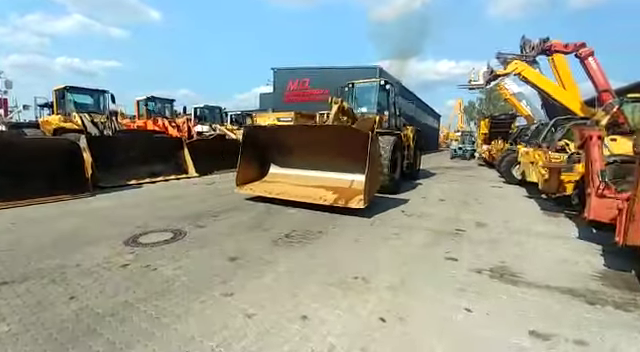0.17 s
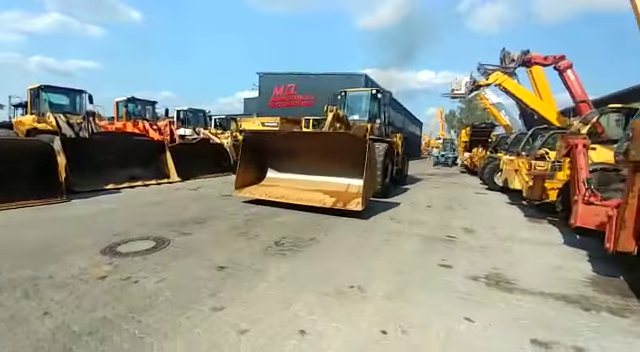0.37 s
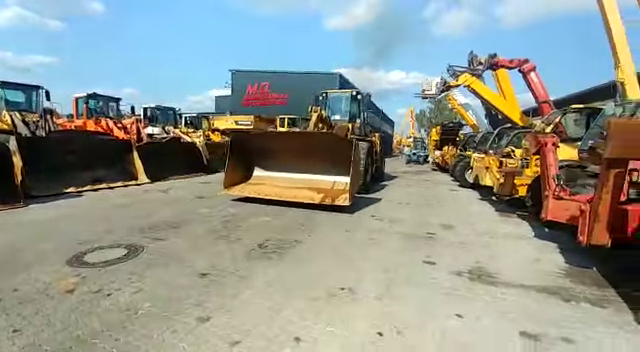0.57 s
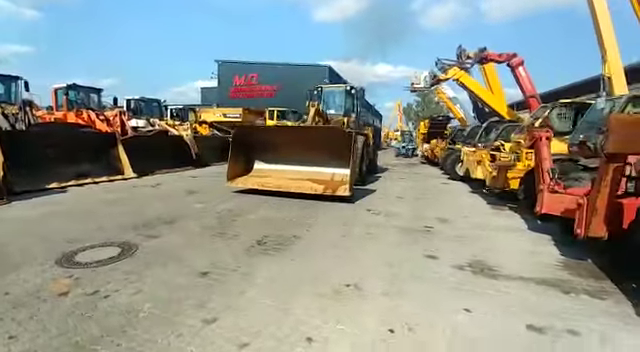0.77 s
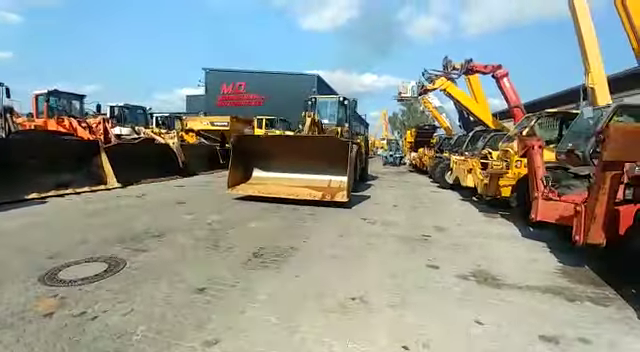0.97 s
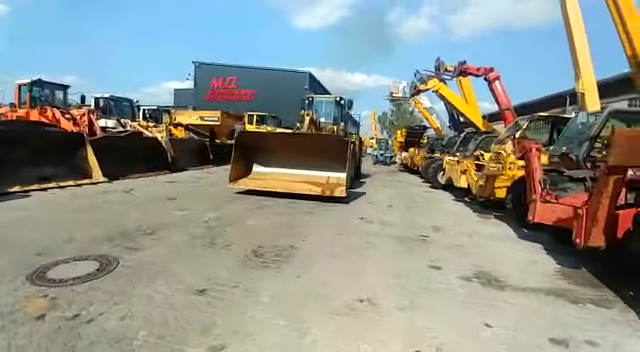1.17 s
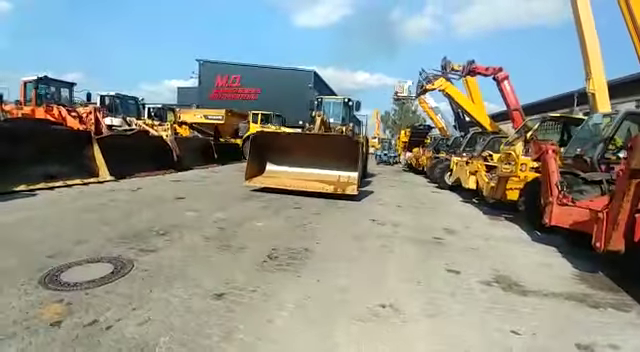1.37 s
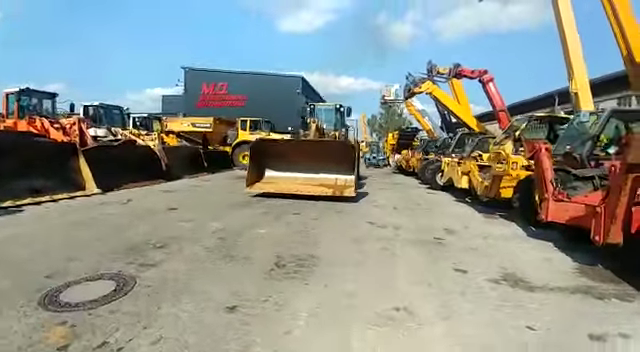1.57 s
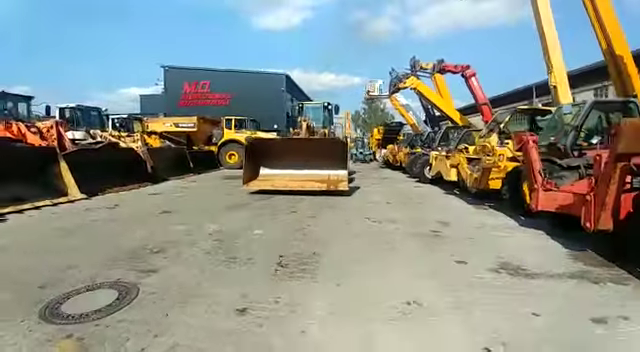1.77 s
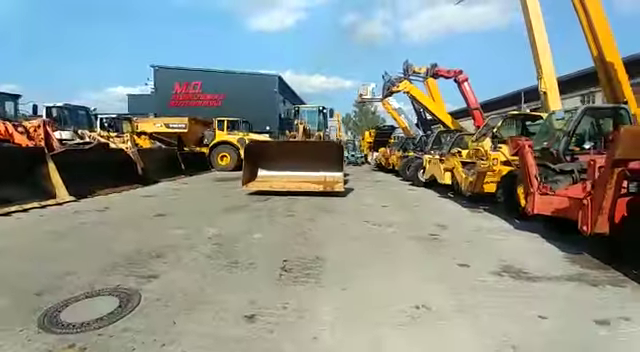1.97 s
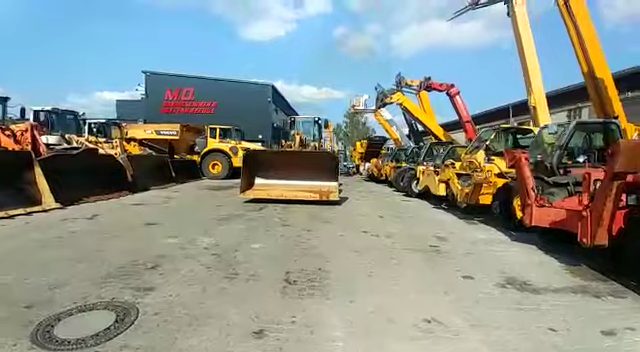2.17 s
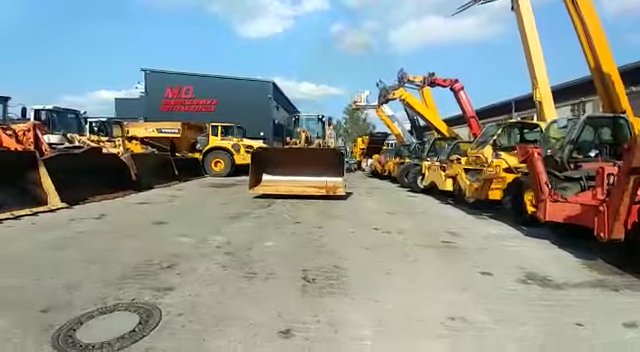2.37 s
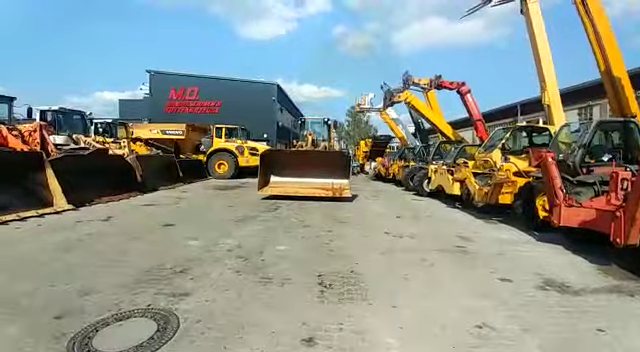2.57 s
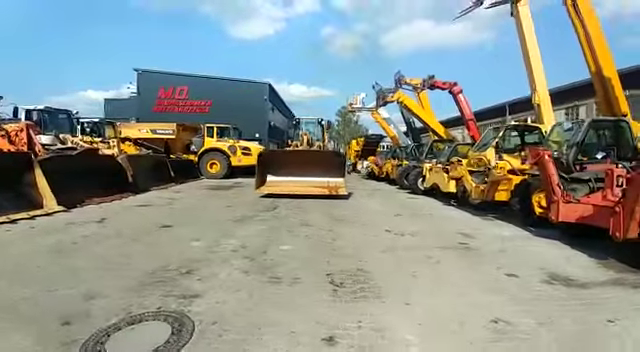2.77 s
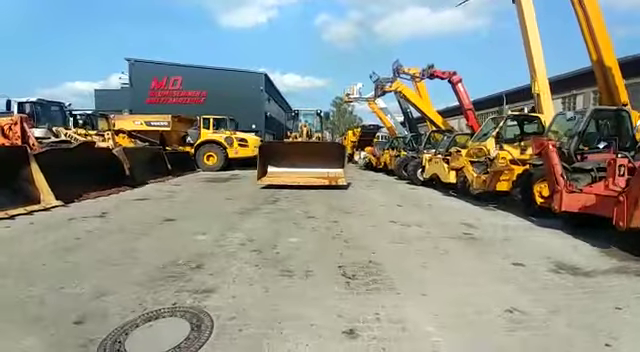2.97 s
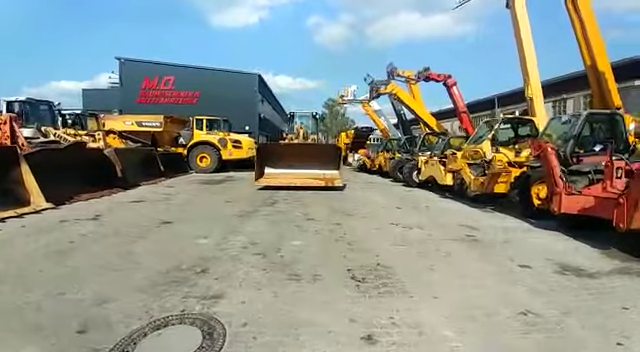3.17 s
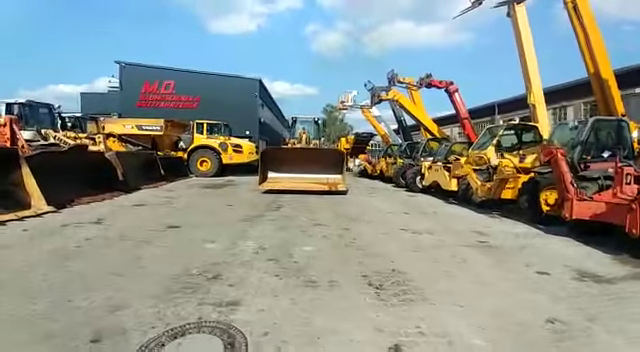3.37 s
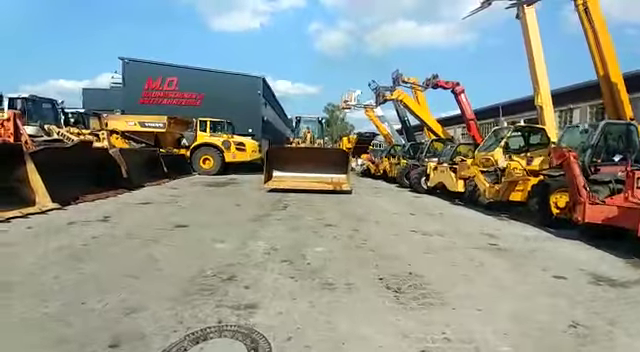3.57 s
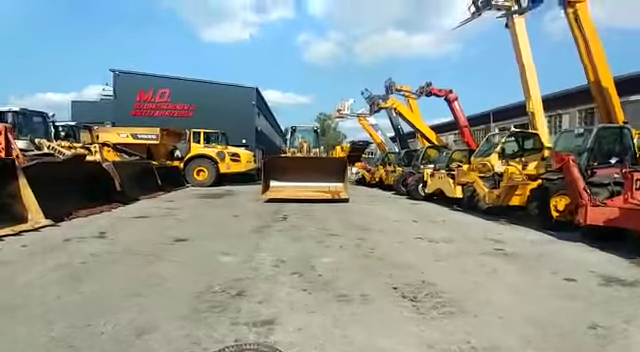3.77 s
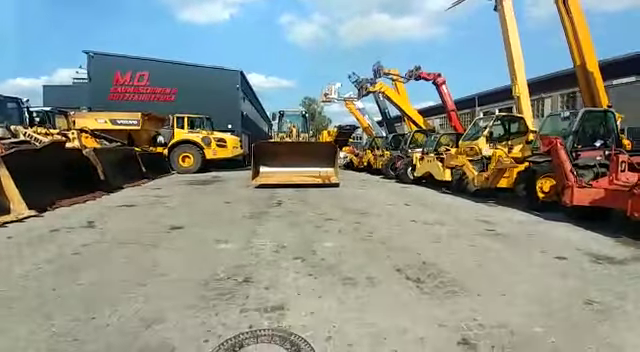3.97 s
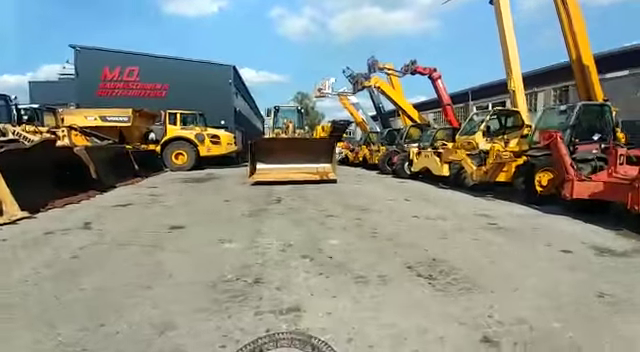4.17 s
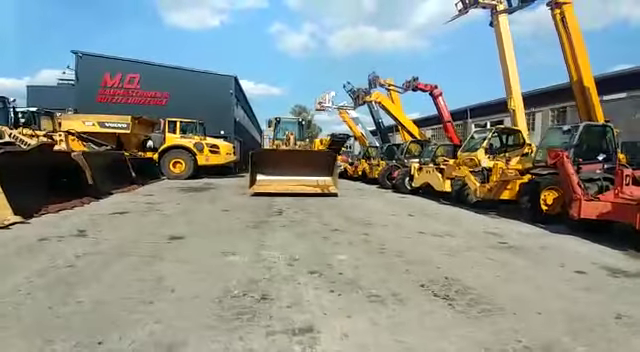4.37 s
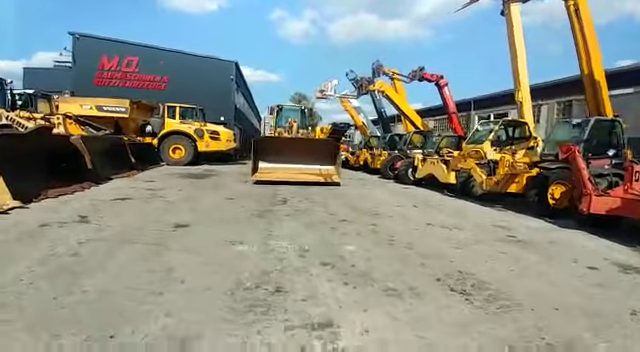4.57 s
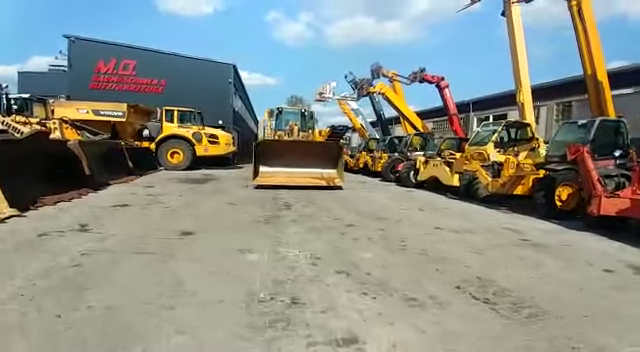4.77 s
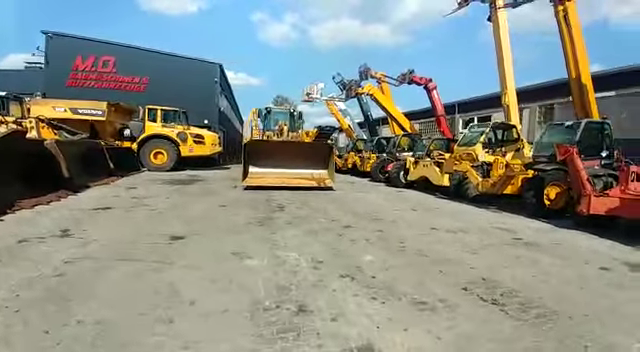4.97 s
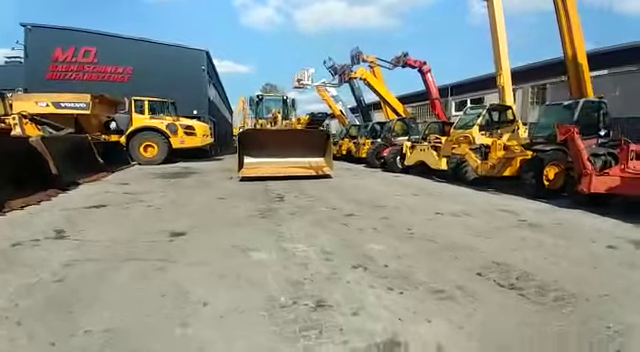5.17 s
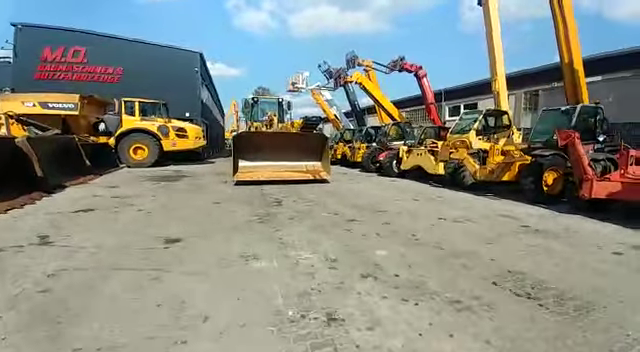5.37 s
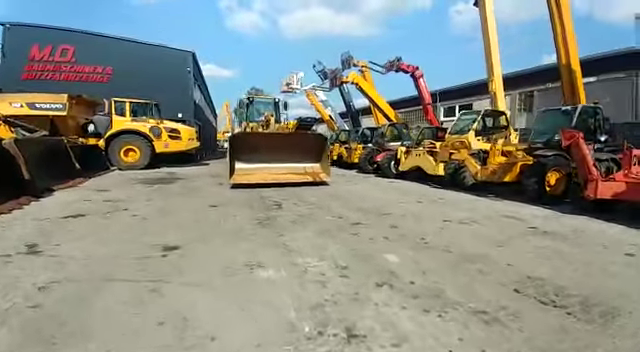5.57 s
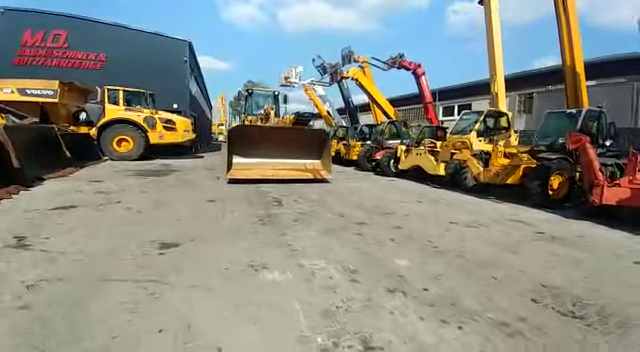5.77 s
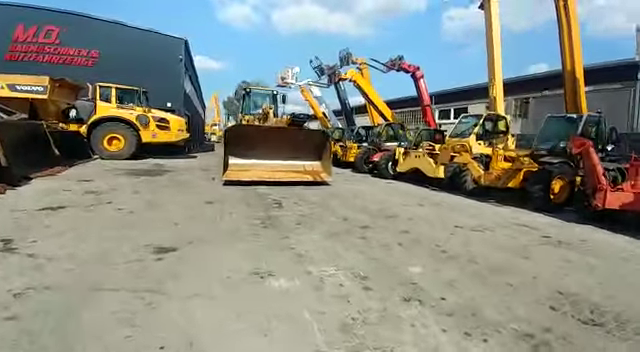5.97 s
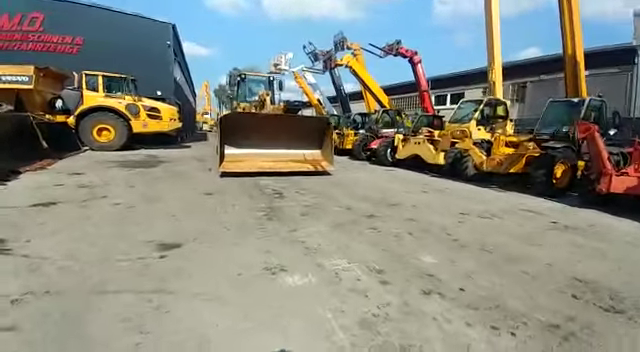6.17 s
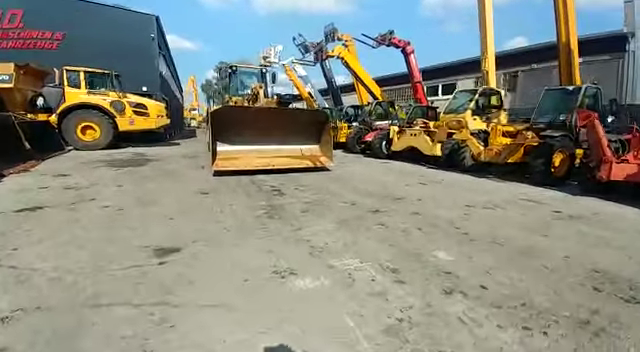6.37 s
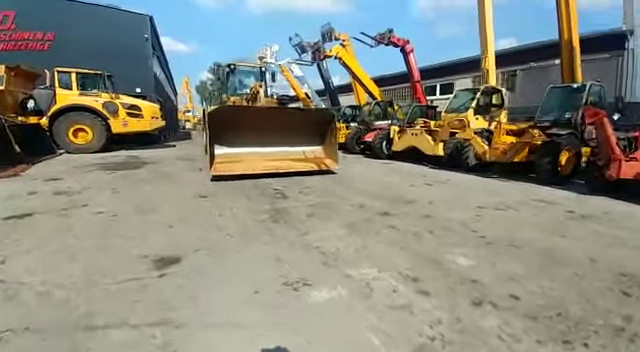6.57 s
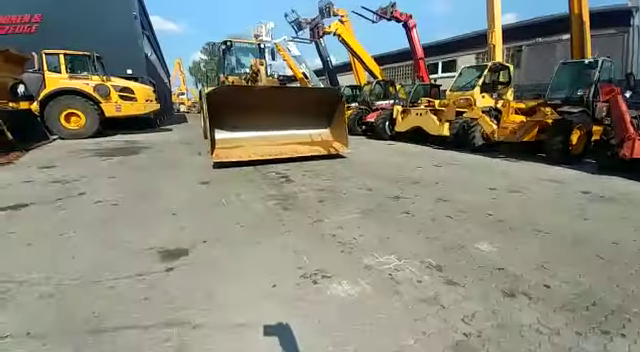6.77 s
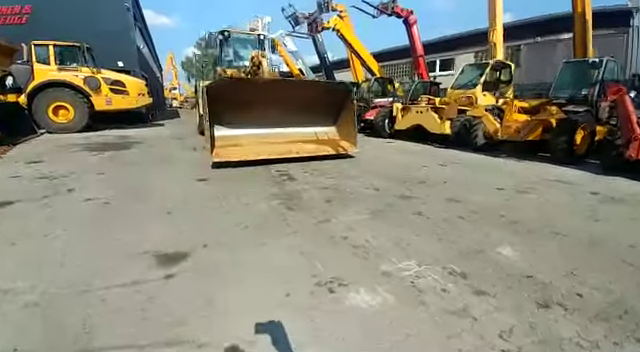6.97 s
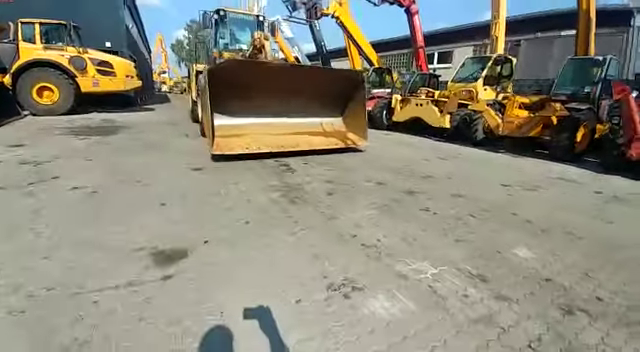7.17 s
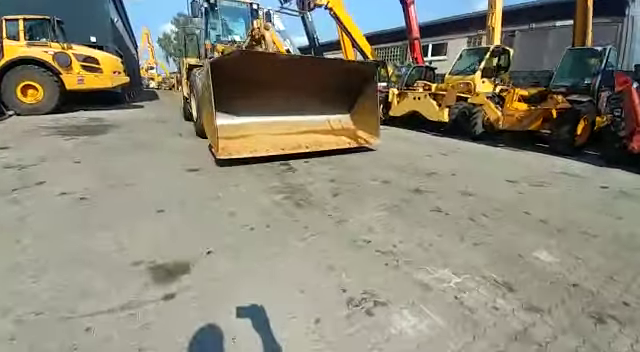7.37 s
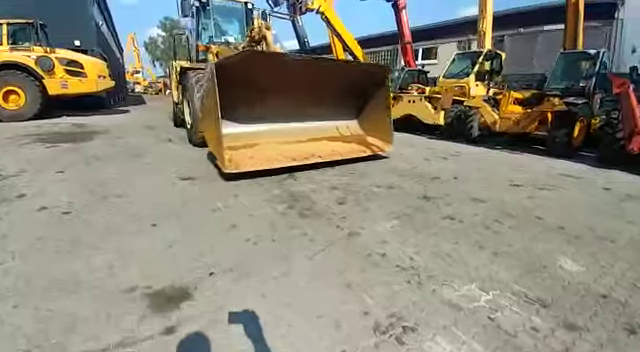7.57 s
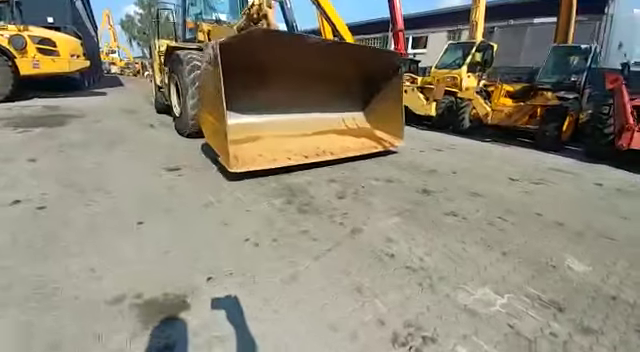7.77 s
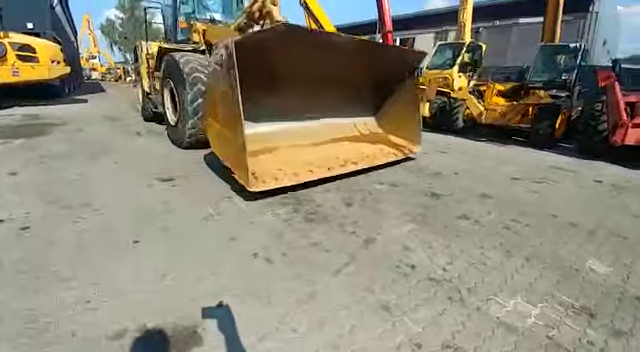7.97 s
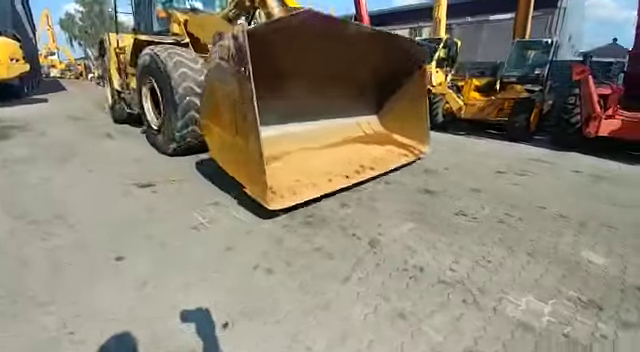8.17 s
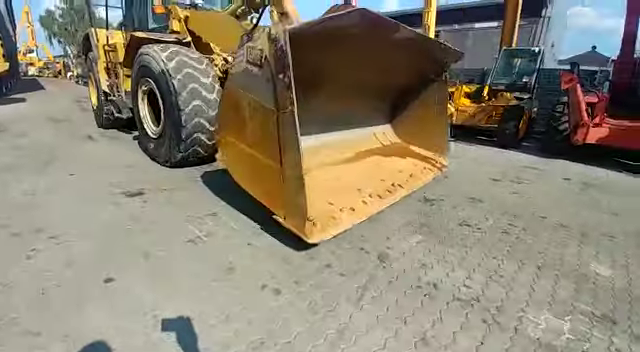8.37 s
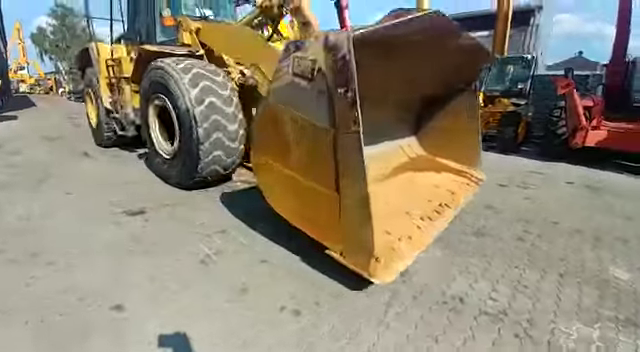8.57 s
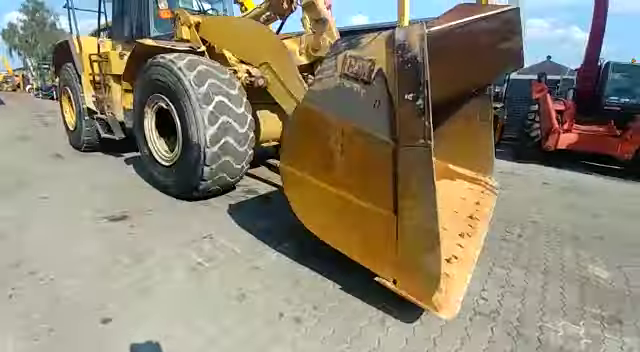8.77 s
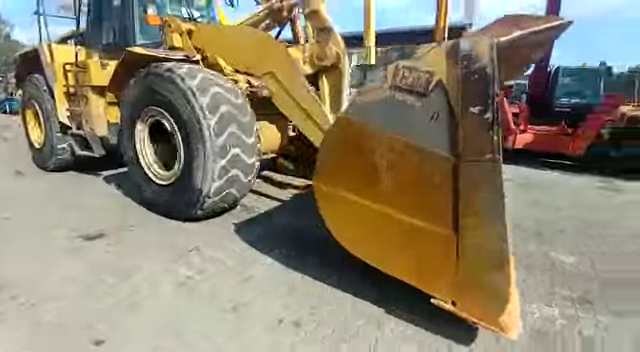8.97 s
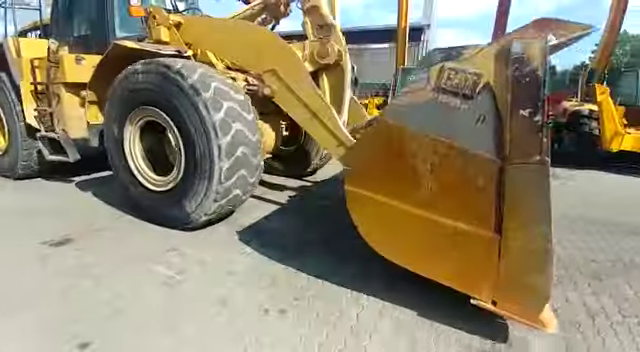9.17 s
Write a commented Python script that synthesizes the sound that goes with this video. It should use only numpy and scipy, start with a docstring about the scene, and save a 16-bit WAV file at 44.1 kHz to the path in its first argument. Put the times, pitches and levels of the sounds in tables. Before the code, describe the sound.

Handheld stereo pickup outdoors among parked machines and a hall: a heavy diesel engine roars nearby and recedes, slowing to a rumbling idle after a hollow double-toned bucket thump. A thin gear whine wavers. Midway the engine labours upward, its exhaust barking under a swelling whoosh of intake air, and an air valve puffs. The loader comes nearer on a deep, nearly steady drone; a tiny hiss spits, then block clatter and roar grow loud and close.

```python
"""A six-cylinder diesel loader backs away over a paved yard, its revs falling, while the empty bucket jolts.
It idles, then pulls up with heavy firings, rushing intake air and a valve puff, and comes close; a second puff follows.
The exhaust booms are sines on multiples of the firing rate, fading in turn as direct and reflected paths interfere.
Gear, pumps and growl are sines tied to the shaft; roar, clatter, rap and air are shaped noise; loud peaks flatten."""
import sys
import numpy as np
from scipy import signal
from scipy.fft import rfft, irfft, next_fast_len
from scipy.io import wavfile
from scipy.ndimage import uniform_filter1d, map_coordinates

SR = 44100
rng = np.random.default_rng(int(sys.argv[2]) if len(sys.argv) > 2 else 0)


def master(y):
    """Save y as 16-bit WAV."""
    cut = np.clip(np.atleast_2d(y).T, -1, 1)
    pcm = np.round(cut * 32767)  # scale
    wavfile.write(sys.argv[1], SR, pcm.astype(np.int16))


N = 406161
COARSE = 14  # samples per step of the low tones
CYLINDERS = 6  # firings per engine cycle

# Strong exhaust tones. Each entry: multiple of the firing rate.
BOOMS = (1, 2, 3, 2 / 3, 7 / 3, 5 / 2)
# Colour of the exhaust pipe. Each row: frequency in Hz, level in dB.
PIPE = [(30, -54.5), (48, -8), (68, -1.5), (105, -7), (140, -5.5), (190, 0), (222, -12), (290, -17),
        (360, -15), (480, -19), (800, -88.5)]
# Direction of the loader. Each row: time in seconds, lag of the left in ms, left over right in dB.
BEARING = [(0, .1, 0.5), (1, .05, 1.5), (2, .09, 1.5), (2.5, -.43, 0.5), (3.5, -0.41, -1), (4, -.41, 0.5),
           (5, -.33, 1.5), (7, -.3, -1.5), (8, -.45, -2), (9.21, -.26, -1)]
# Loader to microphones. Each row: time in seconds, distance in m.
DISTANCE = [(0.0, 8.0), (0.6, 8.37), (1.3, 10.03), (2.0, 12.8), (3.0, 15.2), (4.3, 15.77), (5.5, 16.3),
            (6.2, 13.6), (6.8, 11.17), (7.4, 8.52), (8.0, 7.98), (8.6, 7.25), (9.21, 4.9)]


def amp(db):
    """Decibels are twenty times the logarithm of an amplitude ratio."""
    return 10 ** (np.asarray(db) / 20)


def unit(x):
    """Dividing by the root mean square gives a signal of rms 1."""
    return x / np.sqrt(np.mean(x ** 2) + 1e-20)


def along(points, hz):
    """A spectrum given at (Hz, value) points is interpolated on a log frequency axis."""
    f, v = np.transpose(points)
    return np.interp(np.log(hz + 1), np.log(f + 1), v)


def curves(rows):
    """Slow motion is linear between knots: one value per sample for each column after the time."""
    s, *cols = np.transpose(rows)
    return [np.interp(np.arange(N) / SR, s, c) for c in cols]


def during(rows, order=1):
    """An envelope is linear in decibels: the gain of one column, at -120 dB outside the table."""
    columns = np.transpose(rows)
    return amp(np.interp(np.arange(N) / SR, columns[0], columns[order], -120, -120))


def wobble(rate, size=N):
    """Irregularity as band-limited noise: a smooth random curve over the scene, rate knots a second."""
    count = int(N * rate / SR) + 1
    smooth = map_coordinates(rng.standard_normal(count + 3), [np.linspace(0, count, count * 16)])
    return np.interp(np.linspace(0, 1, size), np.linspace(0, 1, len(smooth)), smooth)


def filtered(x, response):
    """Linear filtering multiplies the spectrum by a response of frequency."""
    m = next_fast_len(N + 8192)
    return irfft(rfft(x, m) * response(np.fft.rfftfreq(m, 1 / SR)), m)[..., :N]


def fine(x):
    """A band-limited low sound made at the coarse step is interpolated to the full rate."""
    return signal.resample_poly(x, COARSE, 1, axis=1)[:, :N]


def tone(angle, apart, drift, flutter_db, rate):
    """Phase and amplitude modulation: a stereo sine, rms 1 before flutter, with sides drifting out of step."""
    n = len(angle)
    phase = angle + drift * wobble(rate, size=n) + rng.uniform(0, 2 * np.pi)
    step = apart * wobble(1.28, size=n)
    level = np.sqrt(2) * amp(flutter_db * wobble(rate, size=n))
    return level * np.sin([phase + step, phase - step])


def orders(rate, turn, colour, multiples, apart, drift, flutter_db, spread_db):
    """Periodicity over a cycle: unequal cylinders excite its harmonics, which come and go; levelled to rms 1."""
    cycle_hz, angle = rate[::COARSE] / CYLINDERS, turn[::COARSE] / CYLINDERS
    out = 0
    for k in multiples:
        strength = amp(along(colour, k * cycle_hz) + spread_db * rng.standard_normal())
        out = out + strength * tone(k * angle, apart, drift, flutter_db, rate=2.5)
    moving_power = uniform_filter1d(np.mean(out ** 2, axis=0), size=2400)
    return fine(out / np.sqrt(moving_power + 1e-9))


def rush(spectrum, patchy_db, direct, ring=np.ones_like):
    """Interaural coherence: patchy noise of rms 1, partly direct with a delay, the rest from all round."""
    # Each row: frequency in Hz, left-right likeness of the surrounding part.
    alike = [(60, 0.94), (140, 0.87), (320, .95), (510, .8), (1040, 0.089), (2110, -0.12), (4300, 0.023),
             (8780, 0.032)]
    z = signal.stft(rng.standard_normal((3, N)), nperseg=512)[2]
    field = uniform_filter1d(rng.standard_normal(z.shape[1:]), size=8, axis=0)
    field = uniform_filter1d(field, size=12, axis=1)
    noise = signal.istft(z * amp(patchy_db * unit(field)), nperseg=512)[1][:, :N]

    # the cosine of twice the mixing angle is the likeness
    angle = lambda hz: np.arccos(np.clip(along(alike, hz), -1, 1)) / 2
    mid, side = filtered(noise[:2], lambda hz: np.array([np.cos(angle(hz)), np.sin(angle(hz))]))
    around = np.array([mid + side, mid - side])
    late = np.arange(N) - np.round(curves(BEARING)[0] * SR / 1000).astype(int)
    straight = np.array([noise[2][np.clip(late, 0, N - 1)], noise[2]])
    share = np.clip(direct, 0, 1)
    both = np.sqrt(share) * straight + np.sqrt(1 - share) * around
    return unit(filtered(both, lambda hz: amp(along(spectrum, hz)) * ring(hz)))


def bucket():
    """Free vibration: the jolted empty bucket hums in decaying modes."""
    # Each row: start in seconds, frequency in Hz, time to fall 60 dB in seconds, level in dB.
    thuds = [(1.709, 62, 0.41, -7), (1.708, 125, 0.3, -5.5), (2.7, 241, 0.56, -21.5)]
    out = 0
    for s, hz, t60, db in thuds:
        since = np.maximum(np.arange(N) / SR - s, 0)
        envelope = amp(db - 60 * since / t60) * (1 - np.exp(-since / 0.0067))
        out = out + envelope * np.sin(2 * np.pi * hz * since)
    return out


def valve():
    """Jet noise: an air valve releases short puffs of hiss, with a narrow band of noise as a hoot."""
    # Each row: start in seconds, length in seconds, hiss gain in dB, hoot level in dB.
    releases = [(5.17, .17, -42.5, -28.5), (8.44, .035, -27.5, -40)]
    # Each row: frequency in Hz, hiss response in dB.
    hiss_colour = [(1200, -20.5), (1700, 6.5), (2300, -1), (5000, 2.5), (9000, 0)]
    # Hoot band: lower and upper edge in Hz.
    hoot_hz = (1500, 1900)
    t = np.arange(N) / SR
    gate = lambda s, length: np.clip(np.minimum((t - s) / .0015, (s + length - t) / 0.009), 0, 1)
    puff_gain = sum(amp(db) * gate(s, length) for s, length, db, _ in releases)
    hoot_gain = sum(amp(db) * gate(s, length) for s, length, _, db in releases)
    narrow = signal.butter(2, hoot_hz, "bandpass", fs=SR, output="sos")
    hoot = unit(signal.sosfilt(narrow, rng.standard_normal((2, N))))
    hiss = filtered(rng.standard_normal((2, N)), lambda hz: amp(along(hiss_colour, hz)))
    return hoot_gain * hoot + puff_gain * hiss


def intake():
    """Turbulent flow noise: intake air rushes under load, its pitch following the turbine speed."""
    # Each row: time in seconds, low, middle and high band in dB, relative turbine speed.
    load = [(2.6, -52, -62, -82, .9), (4.05, -39.5, -44, -64, .92), (4.4, -33.5, -36.5, -47, .98),
            (4.6, -35, -35, -46, .99), (4.85, -37.5, -29.5, -46.5, 1), (5.12, -36.5, -31, -43.5, 1.01),
            (5.35, -37.5, -39, -45.5, 1.01), (5.75, -46, -48, -50.5, 1.01)]
    # Each row: frequency in Hz, level in dB.
    air_colour = [(1100, -22.5), (1700, 0.5), (2300, 0.5), (2800, 1), (3250, -1.5), (3750, -13),
                  (4300, -2.5), (5200, -3.5), (5900, -20), (7500, -40), (9500, -30.5)]
    # Edges between the three bands in Hz.
    split_hz = (2250, 3750)
    speed = curves(load)[-1]
    # reading noise at a varying speed shifts its pitch
    read = np.cumsum(speed) + np.sum(1 - speed[:round(load[-1][0] * SR)])
    noise = rush(air_colour, patchy_db=1.2, direct=0.5)
    below = [filtered(noise, lambda hz: 1 / (1 + (hz / edge) ** 12)) for edge in split_hz]
    bands = below[0], below[1] - below[0], noise - below[1]
    slide = lambda band: map_coordinates(unit(band), np.broadcast_arrays([[0], [1]], read), order=1)
    return sum(during(load, order=k + 1) * slide(band) for k, band in enumerate(bands))


def panel():
    """Sympathetic resonance: a panel hums on one fixed pitch."""
    # Each row: time in seconds, level in dB before flutter.
    hum_level = [(5.3, -44.5), (5.59, -30.5), (7.3, -34), (7.45, -27), (8.3, -38.5)]
    angle = 2 * np.pi * 358 * np.arange(0, N, COARSE) / SR  # 358 Hz
    return during(hum_level) * fine(tone(angle, apart=.3, drift=1.5, flutter_db=2.5, rate=13))


def pumps(rate, turn):
    """Gear ratios fix pitch: shaft-driven pumps sing thin lines that slide with speed and come and go."""
    # Each row: multiple of the firing rate, relative level in dB.
    lines = [(11 / 3, 1), (23 / 3, -4), (8.6, 1), (11.5, -2), (46 / 3, -7), (17, -3), (19.1, -4)]
    out = 0
    for k, db in lines:
        audible = k * rate[::COARSE] < 1450  # Hz, within the coarse rate
        line = tone(k * turn[::COARSE], apart=.5, drift=1.1, flutter_db=5, rate=5)
        out = out + amp(db) * audible * line
    return fine(out)


def gear(turn):
    """Tooth meshing: a gear whines at a fixed multiple of the firing rate, fuzzy and flickering."""
    # Each row: time in seconds, level in dB before flicker and a 2.5 dB cut.
    whine_level = [(1.5, -50), (1.72, -38), (1.95, -44), (2.2, -36), (2.25, -46), (2.35, -35), (2.45, -37),
                   (2.5, -30), (2.6, -35), (2.75, -37), (2.85, -44), (3.04, -37), (3.1, -30), (3.2, -35),
                   (3.4, -37), (3.55, -43), (3.7, -38), (3.85, -60), (4.7, -60), (4.85, -35), (5, -32),
                   (5.1, -39), (5.35, -33), (5.45, -43), (5.5, -30), (5.57, -27), (5.6, -42), (5.65, -32),
                   (5.72, -46), (5.9, -39), (7, -37), (8.1, -45), (9.21, -40)]
    teeth = 67 / 3  # meshes per firing
    flicker = amp(2.2 * wobble(22) - 2.5)
    line = tone(teeth * turn + 1.5 * wobble(12), apart=.7, drift=1.4, flutter_db=3.5, rate=45)
    return during(whine_level) * flicker * line


def rap(turn, clatter_db):
    """Amplitude modulation: one cylinder raps the block once a cycle, unevenly timed and unequal."""
    # Each row: frequency in Hz, level in dB.
    rap_colour = [(400, -30), (520, -3), (580, -0.5), (650, -5), (1000, -30)]
    swing_db = 6 * np.cos(turn / CYLINDERS + .6 * wobble(6)) + 2.5 * wobble(14)
    mid, side = filtered(rng.standard_normal((2, N)), lambda hz: amp(along(rap_colour, hz)))
    ringing = unit(amp(swing_db) * [mid + 0.37 * side, mid - .4 * side])
    return amp(10.5 + 1.406 * clatter_db) * ringing


def knock(rate, turn):
    """Forced vibration: combustion knocks the crankcase at multiples of the cycle rate."""
    # Each row: frequency in Hz, level in dB.
    case_colour = [(300, -11.5), (450, 0.5), (580, -3), (700, -6.5), (800, -7), (1100, -6), (1400, -9)]
    return orders(rate, turn, case_colour, range(24, 96), apart=.6, drift=.4, flutter_db=5, spread_db=3)


def hood(hz):
    """Modal resonance: the sheet-metal engine hood lifts the roar near its modes."""
    # Each row: centre in Hz, width in Hz, lift in dB.
    modes = [(578, 50, 4), (770, 24, 5), (953, 28, 5), (1096, 70, 3), (1165, 30, 3)]
    return amp(sum(db / (1 + ((hz - centre) / (width / 2)) ** 2) for centre, width, db in modes))


def body_and_block(turn, clatter_db):
    """Radiation from vibrating surfaces: panels roar and the block clatters, pulsing with the firings."""
    # Each row: frequency in Hz, level in dB; first the body, then the block.
    body_colour = [(150, -41.5), (260, -2.5), (500, -5), (800, -5), (1150, -5.5), (1600, -7), (2700, -17.5),
                   (3500, -30), (6000, -75)]
    block_colour = [(500, -23.5), (1200, -6), (2300, -6), (2900, -11), (3500, -16), (4300, -14.5),
                    (5300, -21), (7000, -27.5), (9500, -13.5)]
    # Each row: time in seconds, top of the clatter over the rest in dB.
    treble = [(0, 4), (.8, 3), (1.2, -0.5), (2.2, 1.5), (3, -1), (4.2, -3), (4.7, 1.5), (5.7, -4),
              (6.5, -1), (7.7, 1.5), (8.2, 0.5), (9.21, 0)]
    beat = np.cos(turn) + 0.93 * np.cos(turn / 3) + .5 * np.cos(turn / 2)
    shake = wobble(8)
    # pulsing once a cycle, 0.28 dB at 10 m and stronger from close by
    nearness = (10 / curves(DISTANCE)[0]) ** 2
    lope_db = .28 * nearness * (np.cos(turn / CYLINDERS) + 0.51 * wobble(9))

    roar_db = -9.5 + .36 * clatter_db + lope_db + .6 * beat + 0.18 * shake
    roar = amp(roar_db) * rush(body_colour, patchy_db=1.2, direct=0.3, ring=hood)
    block_db = clatter_db + lope_db + 11.5 + 0.36 * beat + 0.46 * shake
    clatter = amp(block_db) * rush(block_colour, patchy_db=1.0, direct=0.092)
    top = (amp(curves(treble)[0]) - 1) * filtered(clatter, lambda hz: hz > 6800)
    return roar + clatter + top


def rumble(growl_db):
    """Broadband flow noise: the pipe colours a patchy rumble 3 dB below the growl."""
    return amp(growl_db - 3) * rush(PIPE, patchy_db=2.2, direct=0.035)


def growl(rate, turn):
    """Subharmonics of firing: unlike cylinders fill the cycle multiples between the booms."""
    between = [k for k in range(2, 36) if k / CYLINDERS not in BOOMS]
    return orders(rate, turn, PIPE, between, apart=0.29, drift=0.34, flutter_db=5, spread_db=2)


def bark():
    """Impulse response: as the engine pulls up to speed, heavy firings ring the muffler."""
    # Each row: start in seconds, level in dB before a 2 dB lift and the envelope, frequency in Hz.
    firings = [(4.519, -14.5, 161.5), (4.619, -13.5, 174.7), (4.662, -13.5, 180.8), (4.749, -13.5, 175.4),
               (4.809, -9.5, 178), (4.895, -7, 184.5), (4.969, -7, 186), (5.062, -8, 184.4),
               (5.097, -14.5, 186), (5.159, -8, 172.3), (5.244, -5, 183.4), (5.289, -6.5, 179.7),
               (5.398, -5.5, 186.3), (5.489, -5.5, 175)]
    rise_s, t60_s = 0.01, 0.21
    rings = 0
    for s, db, hz in firings:
        since = np.maximum(np.arange(0, N, COARSE) / SR - s, 0)
        envelope = amp(db + 2 - 60 * since / t60_s) * (1 - np.exp(-(since / rise_s) ** 2))
        rings = rings + envelope * np.sin(2 * np.pi * hz * since + rng.uniform(0, 2 * np.pi))
    return fine(rings[None])


def paths(hz):
    """Interference: direct and reflected sound add or cancel as the loader moves; gain relative to 10 m."""
    # Mirror images in hall and parked machines.
    # Each row: offset to the side in m, extra distance back in m, share reflected.
    images = [(10.995, 2.5, 0.77), (1.96, 5.5, 0.9), (14.8, 0.0, 0.95), (17.02, 4, 0.83)]
    far = curves(DISTANCE)[0][::COARSE]
    echoes = 0
    for side, back, share in images:
        way = np.hypot(far + back, side)
        echoes = echoes + share / way * np.exp(-2j * np.pi * hz * (way - far) / 343)  # sound in m/s
    return 10 * np.abs(1 / far + echoes)


def exhaust(rate, turn):
    """Harmonics of a pulse train: whole multiples grow with effort, those between come from unlike cylinders."""
    # Each entry: level of one boom in dB, before effort, muffler and paths.
    boom_db = (1.1, -3, -6.5, -21.5, -27.5, -23)
    # Each row: frequency in Hz, muffler response in dB.
    muffler = [(40.0, -29.5), (55.0, -8.5), (80.0, -14.5), (120.0, -17), (150.0, -11), (180.0, 0.0),
               (215.0, -1.6), (250.0, -30.5)]
    # How hard the cylinders fire. Each row: time in seconds, level in dB.
    effort = [(0, -12), (1.2, -7), (1.8, -16.5), (2.4, -17.5), (2.8, -13.5), (3.6, -18.5), (4.3, -28),
              (4.9, -18), (5.6, -11), (7, 0), (8, -1.6), (8.7, -11.5), (9.21, -13.5)]
    # Dips and swells of the lowest whole multiple. Each row: time in seconds, change in dB.
    lowest = [(6.75, 0), (6.97, -8.5), (7.2, 1.5), (7.8, 2), (8.4, -1.5), (8.75, -4), (9.21, 5.5)]
    # Swell of the 7/3 multiple. Each row: time in seconds, change in dB.
    chug = [(0, 4), (.25, 6), (.7, 4), (1.3, -6), (5, 0)]
    rate, turn = rate[::COARSE], turn[::COARSE]
    effort_db, lowest_db, chug_db = [curves(rows)[0][::COARSE] for rows in (effort, lowest, chug)]
    hunt = .12 + 1.8 * np.clip((50 - rate) / 8, 0, 1)  # at idle the speed hunts and blurs the tones
    out = 0
    for k, db in zip(BOOMS, boom_db):
        level_db = db + (k % 1 == 0) * effort_db + (k == 1) * lowest_db + (k == 7 / 3) * chug_db
        gain = amp(level_db + along(muffler, k * rate)) * paths(k * rate)
        out = out + gain * tone(k * turn, apart=.15, drift=hunt, flutter_db=1.2, rate=7)
    return fine(out)


def scene():
    """Superposition: tones, rap, roar and clatter share one shaft angle; the other sources keep their own
    timing; all add linearly."""
    # Each row: time in seconds, firing rate in Hz.
    speed = [(0.0, 81.4), (0.4, 77.17), (1.0, 76.7), (1.3, 71.9), (1.75, 61.35), (2.0, 58.96),
             (2.35, 57.27), (2.6, 48.47), (2.8, 44.4), (3.1, 40.74), (3.8, 32.4), (4.2, 31.94),
             (4.8, 42.78), (5.2, 53.65), (5.6, 59.91), (6.4, 68.25), (6.8, 71.18), (7.7, 70.77),
             (8.2, 72.52), (8.8, 72.26), (9.21, 71.34)]
    # Each row: time in seconds, level in dB that clatter and its followers build on.
    clatter_level = [(0, -32.5), (.3, -34), (1.3, -37), (1.64, -47), (3, -55.5), (4.3, -55), (4.64, -48),
                     (5.21, -37), (5.55, -40), (6.9, -37), (8.1, -39), (8.42, -38), (8.67, -32), (9, -29.5),
                     (9.21, -29.5)]
    # Each row: time in seconds, level of the growl in dB.
    growl_level = [(0, -19.5), (1.2, -20), (1.7, -20.5), (2.4, -24.5), (3, -27.5), (4.3, -29.5),
                   (5.1, -20.5), (5.6, -22), (6.9, -22.5), (8, -22.5), (8.7, -21.5), (9.21, -20.5)]
    rate, clatter_db, growl_db = [curves(rows)[0] for rows in (speed, clatter_level, growl_level)]
    turn = 2 * np.pi * np.cumsum(rate) / SR  # radians, one turn per firing
    sides = amp(np.outer([1, -1], curves(BEARING)[1]) / 2)

    air = valve() + intake()
    # knock and pumps follow the clatter by a share of each dB
    knocking = amp(3 + 0.89 * clatter_db) * knock(rate, turn)
    pumping = amp(-9 + .85 * clatter_db) * pumps(rate, turn)
    mechanical = panel() + pumping + gear(turn) + rap(turn, clatter_db) + knocking
    surfaces = body_and_block(turn, clatter_db) + rumble(growl_db)
    low = sides * (bucket() + amp(growl_db) * growl(rate, turn) + bark() + exhaust(rate, turn))
    return air + mechanical + surfaces + low


def record(dry):
    """Port resonance and saturation: the treble is lifted, loud peaks flatten, the top is cut off."""
    # Each row: frequency in Hz, response of the microphone ports in dB.
    port = [(15, -28.5), (30, 0.5), (5500, 2), (6950, 2), (7900, 6.5), (8600, -3.5), (9000, -16),
            (9380, -30)]
    # Each row: frequency in Hz, left port over right in dB.
    lean = [(400, 2), (1400, -1.5), (4500, 1), (8500, 0)]
    x = filtered(dry, lambda hz: amp(along(port, hz) + np.outer([1, -1], along(lean, hz)) / 2))
    x = x / (1 + np.abs(x / .99) ** 8) ** (1 / 8)  # smooth limit at 0.99
    return filtered(x, lambda hz: hz < 9380)


dry = scene()
out = record(dry)
master(out)
```